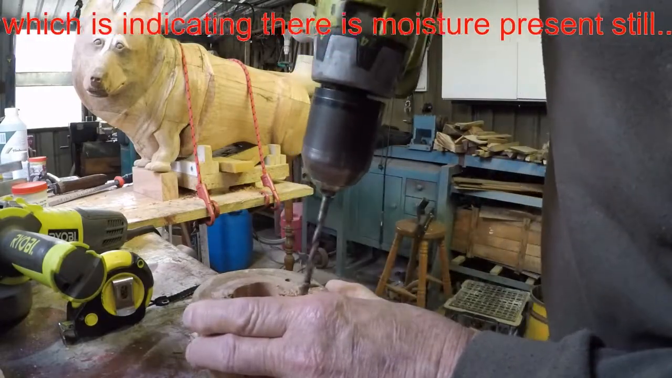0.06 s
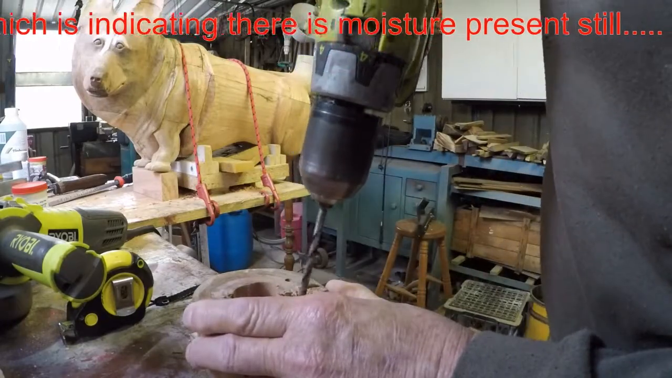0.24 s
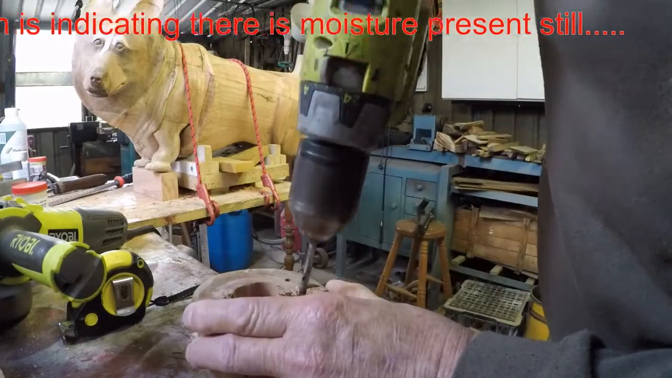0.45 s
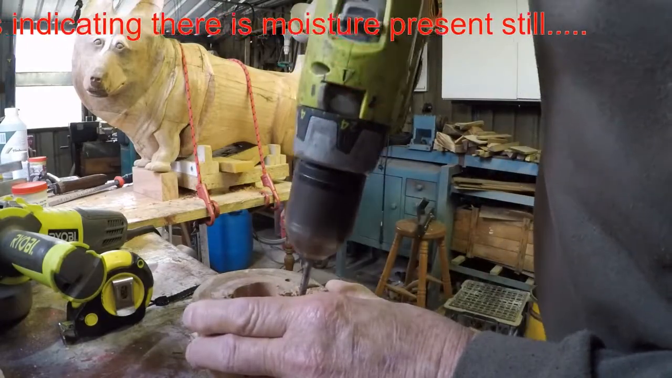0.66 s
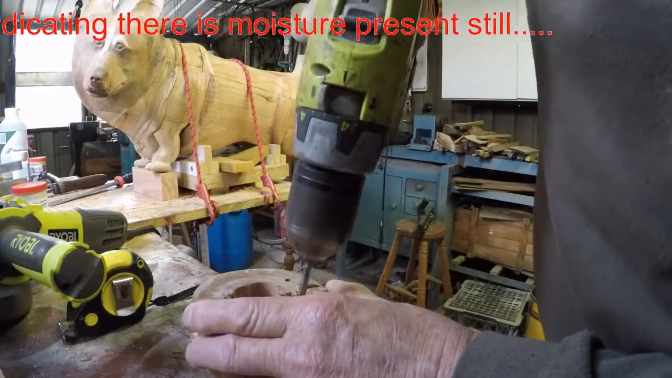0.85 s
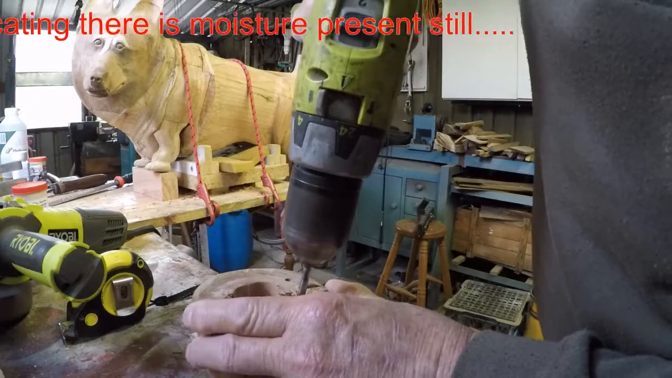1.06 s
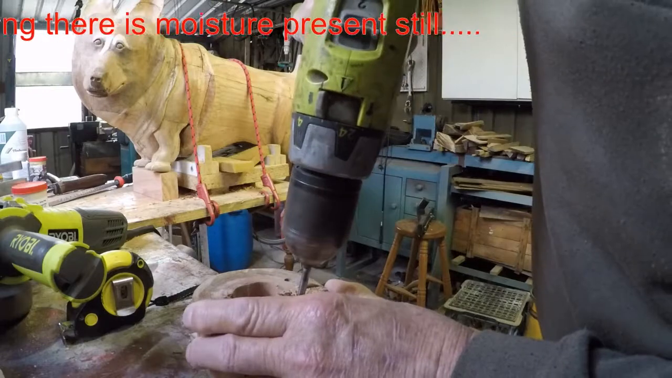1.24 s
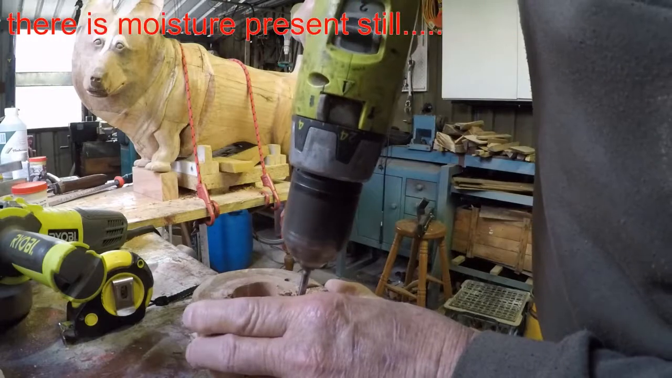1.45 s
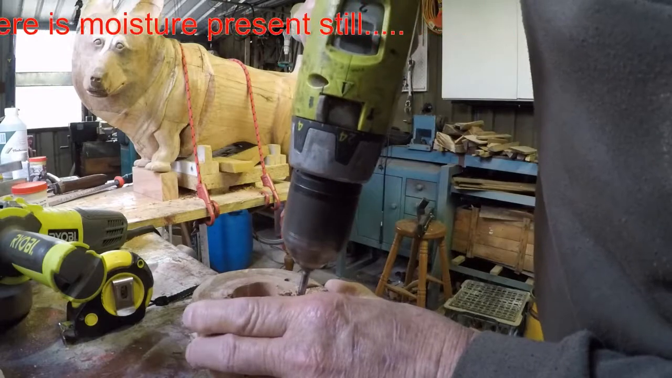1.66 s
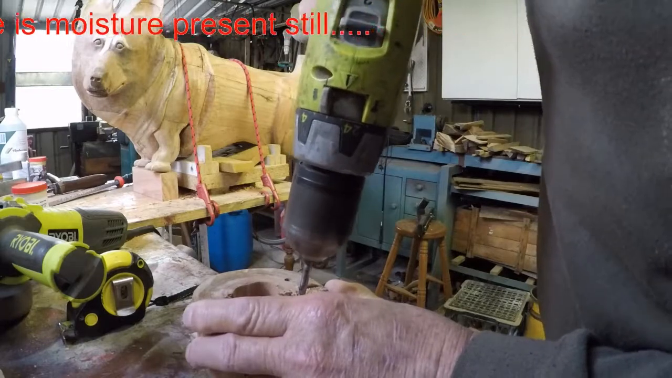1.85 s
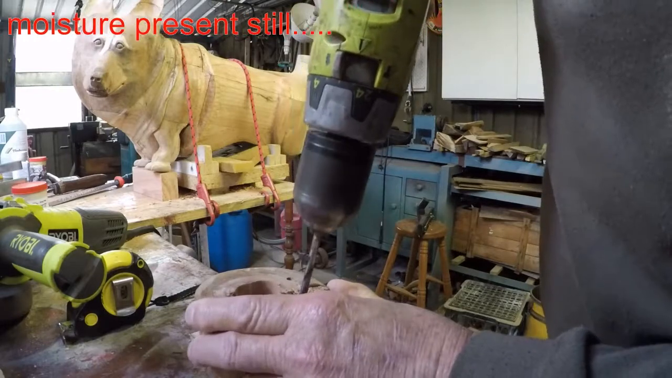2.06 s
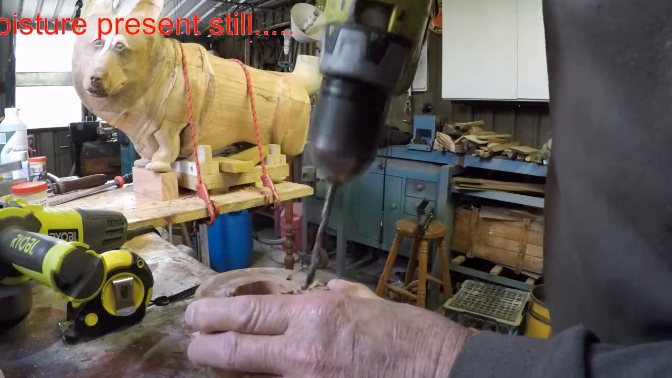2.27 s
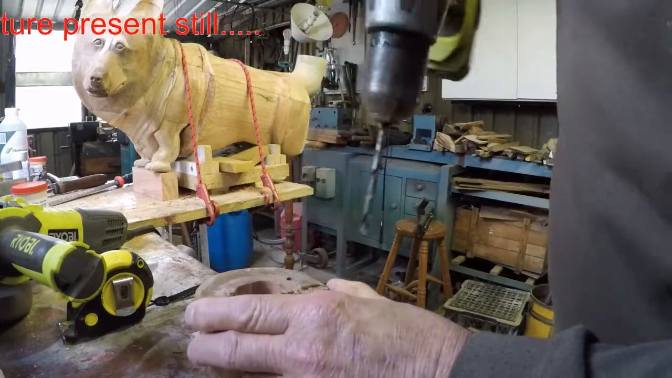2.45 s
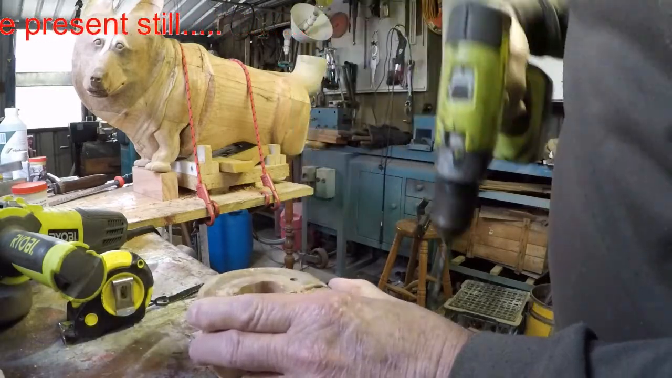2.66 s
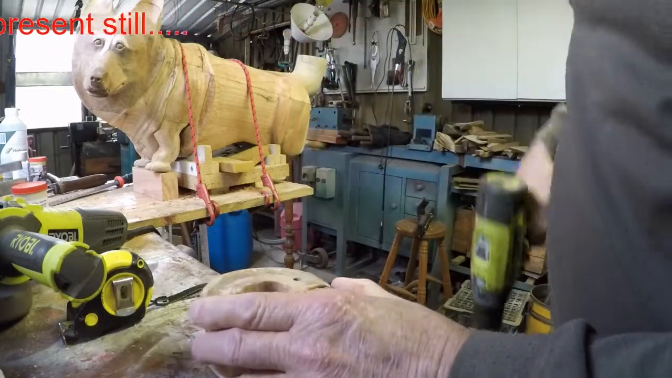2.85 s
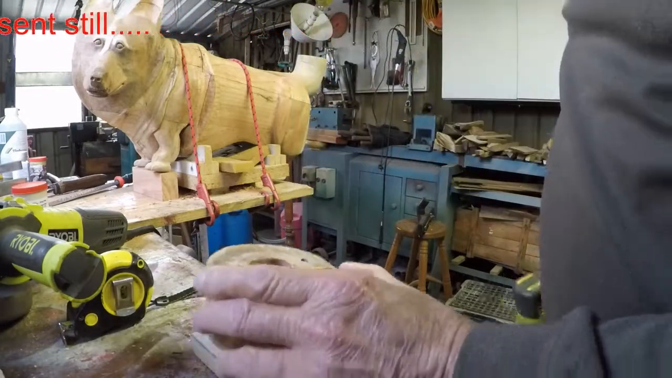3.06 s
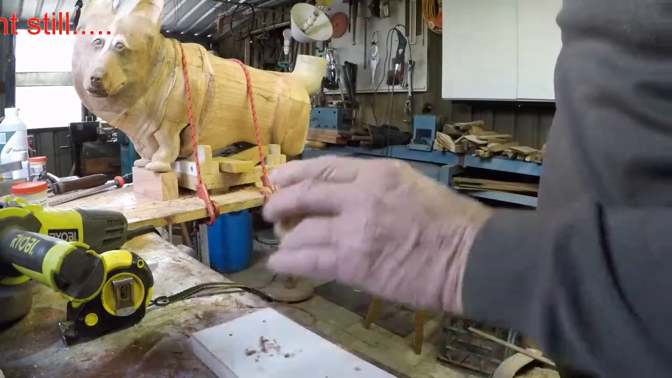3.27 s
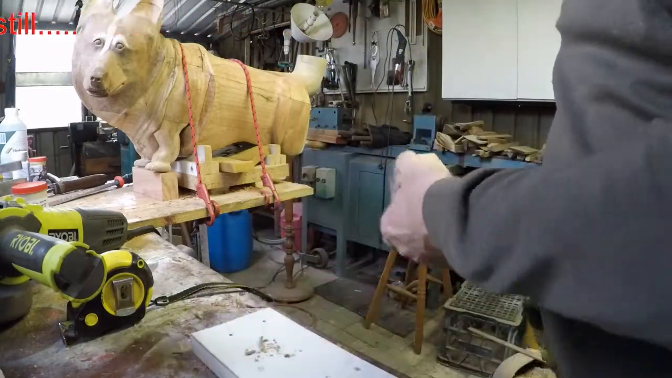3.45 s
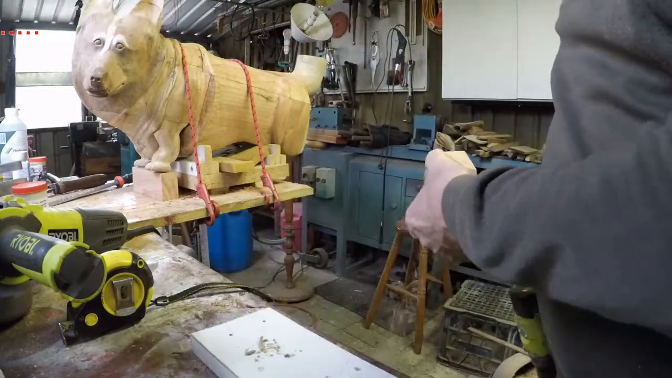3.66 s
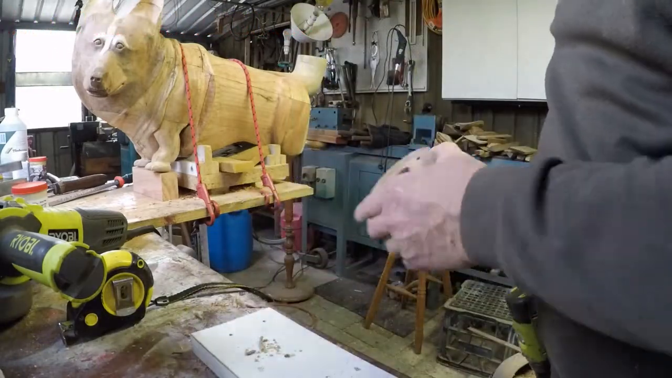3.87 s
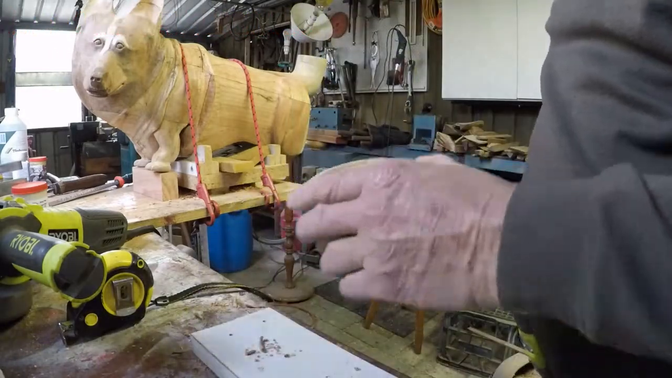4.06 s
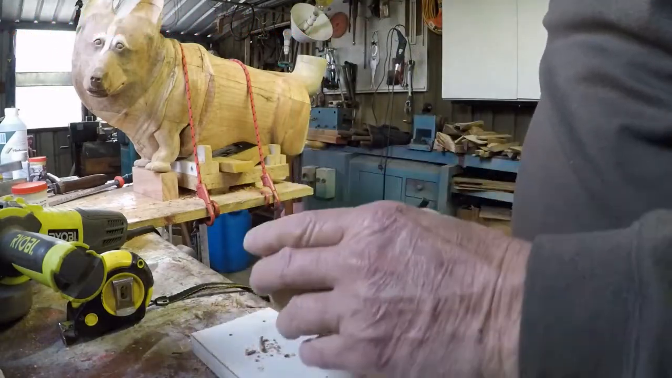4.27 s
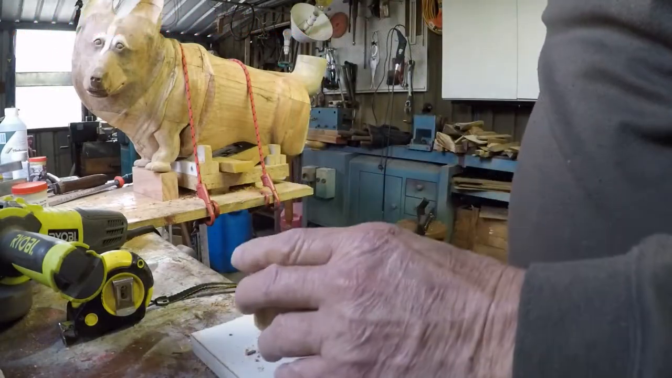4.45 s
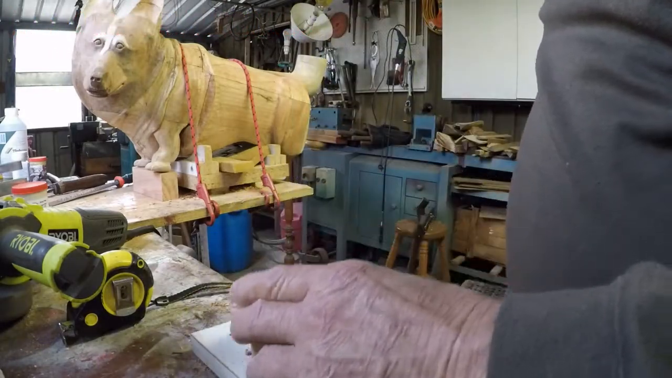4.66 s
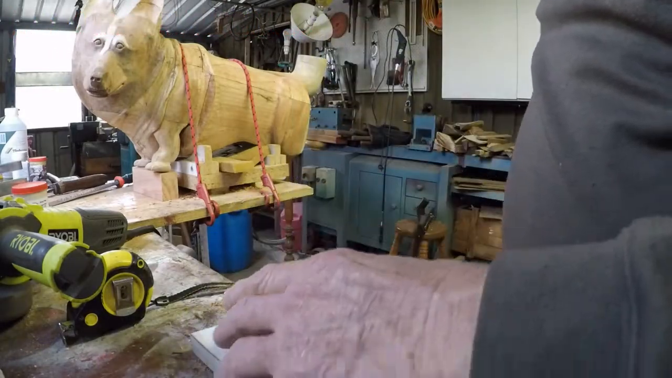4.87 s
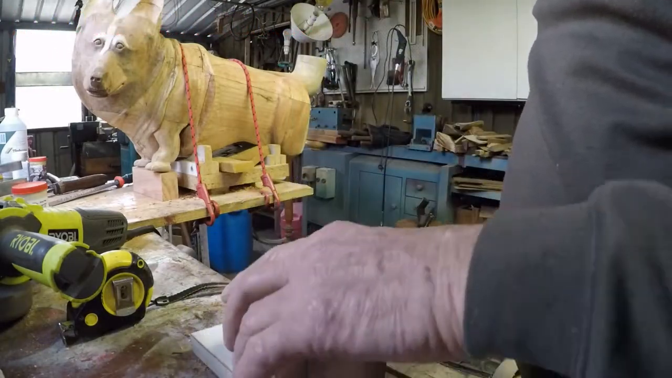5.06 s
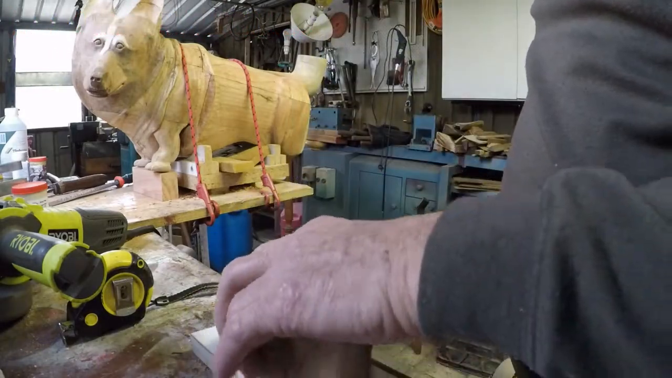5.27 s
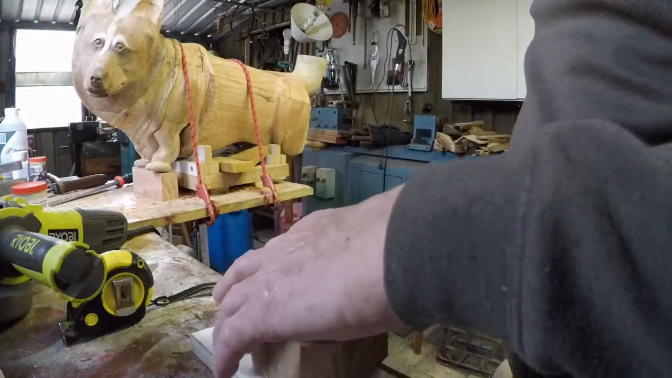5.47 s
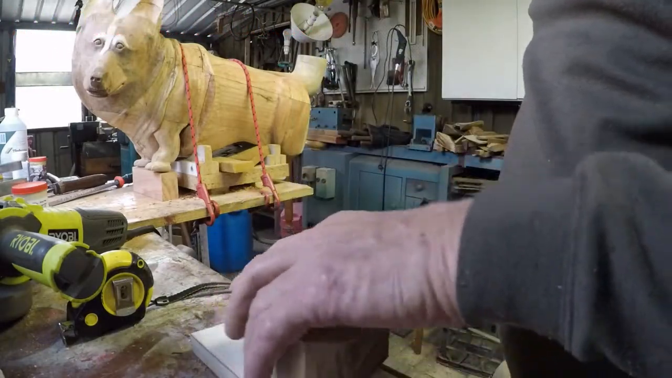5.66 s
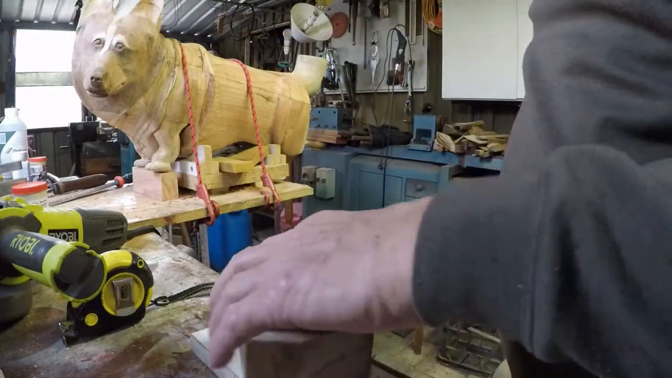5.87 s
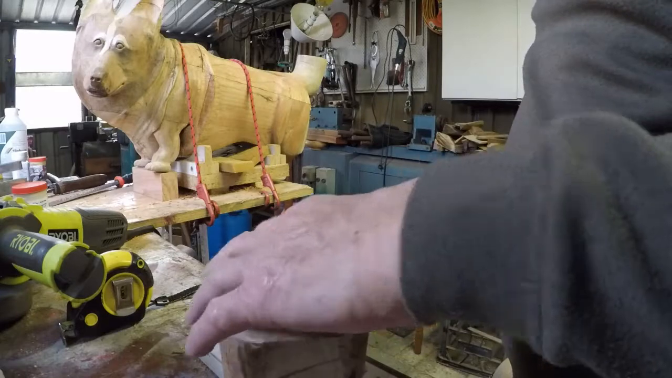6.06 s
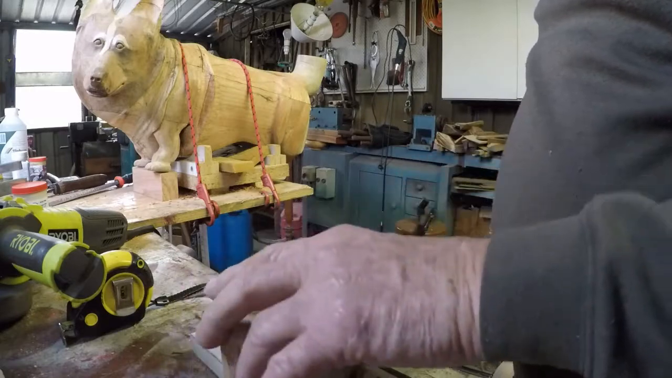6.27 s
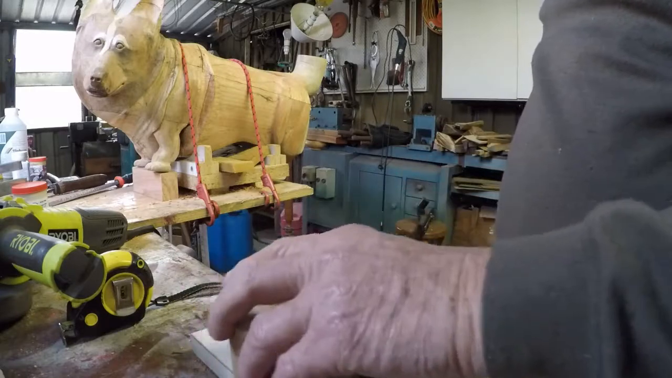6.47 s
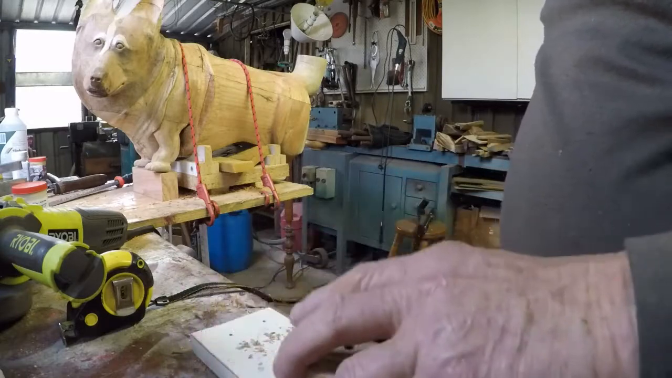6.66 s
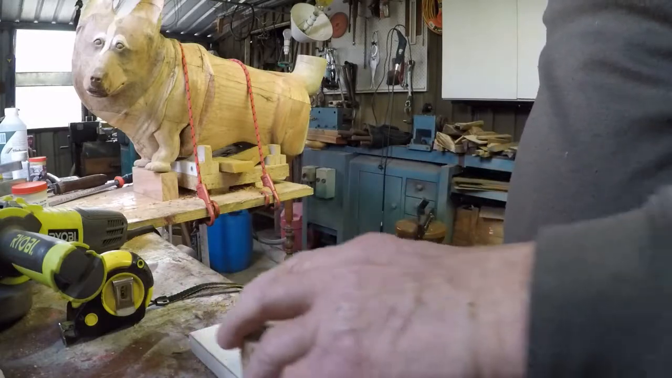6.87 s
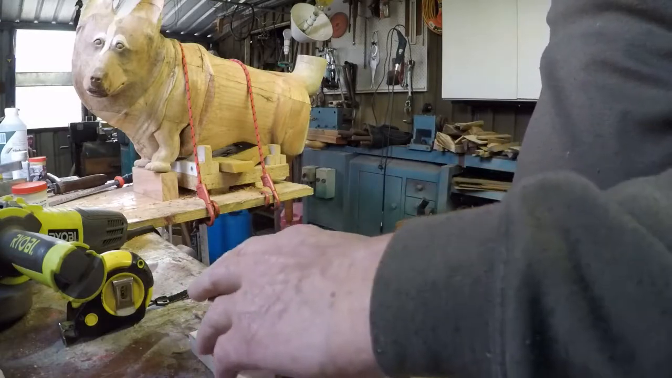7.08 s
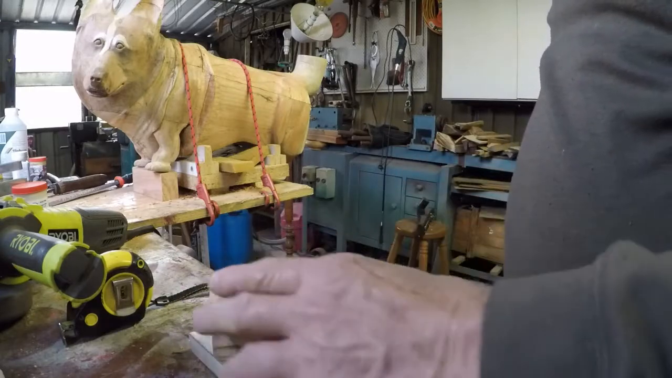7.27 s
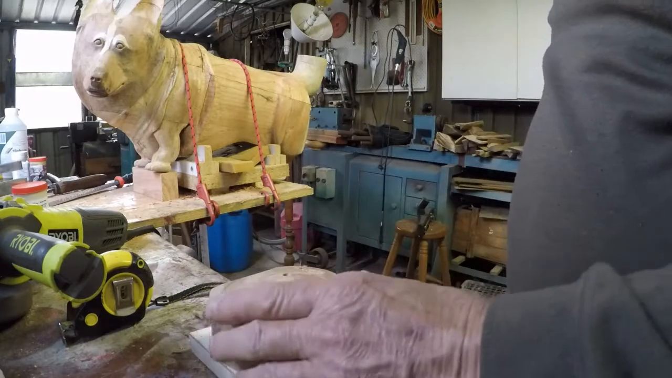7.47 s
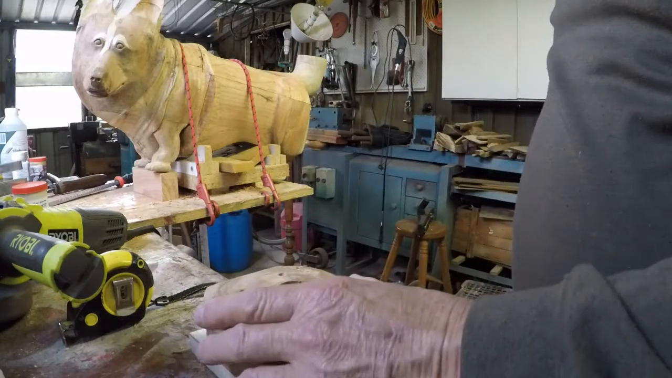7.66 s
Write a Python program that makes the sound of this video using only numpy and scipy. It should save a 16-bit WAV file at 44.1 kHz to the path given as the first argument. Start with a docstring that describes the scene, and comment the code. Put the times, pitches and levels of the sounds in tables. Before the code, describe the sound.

Loud, close drill motor with bench hum and fine cutting hiss, chirping as the bit works deeper, then a hard clack and sudden quiet. A small thud sets the tool down. Low shop air, a barely audible distant siren and two-note bird calls remain while a wood block is bumped, rocked and briefly scuffed on a resonant bench; the sound begins nearly mono and opens to stereo.

```python
"""A cordless drill bores into a wooden block on a workshop bench close to two microphones: motor-locked tones
over shaped noise, with chirped squeaks. It brakes in bursts of noise and is set down, its modes struck ringing.
The block is then knocked and slid: blows and stick-slip grains ring the bench, over filtered scuffing noise.
Outdoors a far siren wails throughout, a gliding tone; later a bird repeats a two-note call; shop air is noise.
The camera's pair is mono below the top treble at first, then spreads to stereo; loud sound is ducked."""
import sys
import numpy as np
from scipy import signal
from scipy.fft import rfft, irfft, next_fast_len
from scipy.io import wavfile
from scipy.ndimage import uniform_filter1d

SR = 44100
rng = np.random.default_rng(int(sys.argv[2]) if len(sys.argv) > 2 else 0)


def bounce(signal):
    """Save signal as a 16-bit WAV file at the path given by the first command-line argument."""
    frames = np.transpose(np.atleast_2d(signal))
    limited = np.clip(frames, -1, 1)
    pcm = np.round(limited * 32767).astype(np.int16)
    wavfile.write(sys.argv[1], SR, pcm)


N = 340452   # samples

# All spectra give relative density; noise is scaled to rms 1 after shaping.
# Drill, close by. Motor speed, overshooting, sagging under load, dropping on release: time_s, turns_per_s
MOTOR_SPEED = [(0, 236), (.105, 238), (.125, 251), (.19, 254), (.26, 263), (.4, 268), (.47, 263),
               (.6, 260.5), (.92, 256), (1.1, 257.4), (1.35, 256.5), (1.5, 258), (1.6, 254), (1.67, 247),
               (1.78, 256), (1.9, 258), (2.02, 250), (2.12, 248), (2.21, 262), (2.24, 257), (2.27, 248),
               (2.33, 230), (2.36, 222)]
# How hard the drill works: time_s, whirr_db, bench_shudder_db, gear_whine_db
EFFORT = [(0, -20.5, -34.5, -52), (.04, -22.5, -30, -46.5), (.065, -19.5, -25, -27.5),
          (.1, -20.5, -31, -33), (.13, -18.5, -31, -22.5), (.24, -18.5, -32.5, -25.5),
          (.5, -17.5, -23.5, -25.5), (.72, -16.5, -33, -28), (.95, -17, -25, -26), (1.5, -17, -27.5, -24.5),
          (1.68, -18.5, -30, -30.5), (1.8, -19.5, -38.5, -25.5), (1.99, -18, -33.5, -29),
          (2.03, -19.5, -35, -24), (2.23, -19.5, -39.5, -25.5), (2.265, -19.5, -32, -32),
          (2.29, -22.5, -45, -40), (2.36, -20.5, -38, -67)]
# Brushes, gears and cutting: pitch_hz, density_db
WHIRR_SPECTRUM = [(180, -31.5), (300, -26), (445, -8.5), (641, -8), (830, -13), (1330, 1), (2480, -13.5),
                  (3200, -15), (3550, -12), (3850, -4), (4760, -6.5), (5880, -4), (8210, -30),
                  (11300, -34.5), (14700, -79), (22000, -120)]
# Resonances of the housing: pitch_hz, width_hz, lift_db
HOUSING = [(1228, 130, 4.5), (3770, 120, 4), (4420, 270, 1.5), (2642, 40, 5), (3180, 45, 6.5),
           (5305, 65, 6), (5860, 240, 1), (6460, 300, 5), (7470, 170, -2), (8800, 300, 4.5)]
# Cooling air: pitch_hz, density_db
FAN_SPECTRUM = [(11000, -30), (12000, -6), (12800, 0), (14000, -2), (15250, -4), (15450, -40)]
# Bench under load: pitch_hz, density_db
SHUDDER_SPECTRUM = [(20, 0.5), (35, 4), (70, -4.5), (110, -1.5), (142, 7), (185, -1.5), (350, 0.5),
                    (600, -33.5)]
# Hiss of the bit cutting fibres: time_s, level_db
CUTTING_LEVEL = [(0, -51), (.3, -35.5), (.55, -29.5), (1.5, -30), (2.2, -36.5), (2.26, -69)]
# Colour of that hiss: pitch_hz, density_db
CUTTING_SPECTRUM = [(2200, -20.5), (2800, -0.5), (3200, 0.5), (3600, -3.5), (4200, -40)]
# Bench humming with the motor while the bit is deep: time_s, level_db
HUM_LEVEL = [(0, -44), (.22, -28), (.5, -29), (.6, -20), (.82, -14), (1.0, -17.5), (1.15, -15),
             (1.3, -16.5), (1.47, -14), (1.58, -20), (1.7, -21), (1.8, -44), (2.12, -36), (2.3, -48)]
# High whine at 50 times the motor turns: time_s, level_db
TOP_WHINE_LEVEL = [(0, -68), (.3, -41.5), (.6, -40), (1.4, -41), (1.6, -50), (1.9, -45), (2.3, -56)]
# Gear tones beside the whine: multiple of motor turns, level_db (against the whine curve)
GEAR_ORDERS = [(10, -14), (20, -10)]
# Tones under load: multiple of motor turns, level_db (against the cutting hiss)
LOAD_ORDERS = [(7.5, -12), (11.4, -10), (12.5, -6), (17, -5), (22.6, -3)]
GEAR_RATIO = 16   # motor turns for one turn of the bit
PARTNER_MULTIPLE, PARTNER_DB = 2.46, -16   # weak tone with the hum: times motor turns, against the hum
# The bit catches on its way out: start_s, level_db
BUMPS = [(1.962, -20), (2.014, -18.5)]
# Modes those catches ring: pitch_hz, level_db, t60_s
BUMP_MODES = [(254, 3.5, 0.068), (335, -10, .05), (415, -13, 0.073)]
# The bit squeaks in the hole: start_s, peak_db, pitch_hz (at mid squeak)
SQUEAKS = [(1.2531, -24.5, 7800), (1.309, -16.5, 7640), (1.4197, -46, 7740), (1.478, -14.5, 7540),
           (1.5883, -27, 7550), (1.6117, -33.5, 8840), (1.6433, -14, 7450), (1.6696, -26, 8860),
           (1.7055, -20, 7660), (1.729, -32.5, 8640)]

# The spindle locks: start_s, level_db
BRAKE_SNAPS = [(2.3444, -11), (2.362, -2), (2.375, -17)]
# The case jolts as the spindle stops, one row: start_s, level_db, pitch_hz, t60_s
BRAKE_THUD = (2.368, -13, 330, 0.045)
# The snap's colour: pitch_hz, density_db
SNAP_SPECTRUM = [(200, -34), (500, 1.5), (1300, 6.0), (5500, 6.5), (8000, -16.0), (11000, -18.0),
                 (14000, -4.0), (15800, -26.5)]
# The tool lands and settles on the bench: start_s, level_db
TOUCHES = [(2.665, -45), (2.7083, -17.5), (2.7284, -27), (2.744, -30), (2.767, -54), (3.879, -60),
           (4.17, -45)]
# Modes of the tool: pitch_hz, level_db, t60_s
TOOL_MODES = [(210, 10.5, 0.029), (412, 7, 0.037), (615, -4, 0.082), (910, -6.5, 0.062), (1310, 1, 0.027),
              (1634, -5, 0.092), (2280, 3.5, 0.009), (3980, -10, .03), (5800, -18, 0.13)]
# Grit of each touch: pitch_hz, density_db
TOUCH_SPECTRUM = [(100, -6), (300, 4.5), (1500, -11.0), (4500, -22.0), (7000, -36)]

# The block strikes the bench: start_s, blow_db, hardness_db_per_octave
KNOCKS = [(4.605, -14, -3), (4.618, -3.5, 2.5), (4.716, -9, -3), (4.789, -23, -0.5), (5.113, -26, -3),
          (5.225, -30, -3), (5.458, -28, -13), (5.529, 0, 0), (5.5416, -6, -2.5), (5.738, -20, -12),
          (5.817, -18, -2), (6.24, -26, -3), (6.303, -12, -13), (6.657, -8, -13), (6.737, 1.5, -4.5),
          (6.752, -24.5, 6), (6.868, -13, -5), (6.941, -12.5, -2.5), (7.01, -23, -10), (7.067, -4.5, -12.5),
          (7.515, -23, -0.5)]
# Airborne tick of a knock: pitch_hz, density_db
KNOCK_SPECTRUM = [(1000, 9.0), (2000, 6.0), (4000, -10.5), (8000, -20.0), (12000, -40)]
# Chips snap under the block: start_s, level_db
CHIP_SNAPS = [(5.19, -50), (6.302, -43), (6.604, -52), (6.68, -37), (6.754, -23), (6.826, -42),
              (6.943, -40), (7.018, -41)]
# Colour of a chip's snap: pitch_hz, density_db
CHIP_SPECTRUM = [(1500, -15), (3000, -10.0), (7000, 4), (10000, -7), (14000, -40)]
# Bench as each microphone feels it: pitch_hz, t60_s (base, scaled for blows and rubs), struck_db,
# rubbed_db, left_share (signed, right microphone = 1)
BENCH_MODES = [(97, 0.23, -3, -0.5, -0.16), (127.3, 0.49, -14, 1.5, -0.16),
               (147.5, 0.21, 2.5, -2.5, -0.058), (182, 0.035, -24, -16.5, -0.36), (265, 0.16, 0, -7, -0.2),
               (375, 0.04, -5.5, -14, -0.43), (507, 0.064, -2, 3, -0.39), (588, 0.1, -13.5, -10.5, -1.51),
               (990, 0.0077, -23, 11, -0.92), (1210, 0.011, -1, 8, -0.58), (1840, 0.0072, -17, -18, -0.41),
               (2300, 0.012, -29, -19, -1.08)]
# The block pushes and rocks the bench: start_s, length_s, rumble_db, grind_db
ROCKS = [(4.61, 0.056, -17, -28), (4.66, 0.11, -19, -30), (5.11, 0.053, -27.5, -36.5),
         (5.22, 0.17, -16.5, -25), (5.43, 0.013, -18.5, -31), (5.548, 0.007, -15, -26),
         (5.58, 0.042, -18, -49), (5.66, 0.31, -31, -45.5), (5.83, 0.11, -12.5, -27),
         (5.98, 0.015, -23.5, -31), (6.13, 0.11, -36, -58.5), (6.25, 0.032, -23.5, -34.5),
         (6.31, 0.091, -17, -32.5), (6.67, 0.036, -14, -35), (6.74, 0.047, -5, -36),
         (6.82, 0.022, -30, -26.5), (6.87, 0.021, -15.5, -28), (6.92, 0.096, -10, -27.5),
         (7.07, 0.052, -35, -35), (7.11, 0.027, -23, -38.5), (7.31, 0.2, -41.5, -62),
         (7.53, 0.047, -24, -37), (7.63, 0.051, -28, -41)]
# Its face rubs along the top: start_s, length_s, rasp_db, scuff_db
RUBS = [(4.72, 0.15, -70, -51.5), (5.12, 0.023, -62, -53.5), (5.185, 0.057, -65, -49.5),
        (5.26, 0.16, -58, -48), (5.3, 0.045, -66, -44.5), (5.78, 0.061, -61, -49.5),
        (5.85, 0.05, -50.5, -40), (6.3, 0.11, -57, -48), (6.665, 0.0074, -52, -48), (6.745, 0.01, -33, -48),
        (6.76, 0.017, -45, -43.5), (6.81, 0.04, -55, -42.5), (6.865, 0.027, -38, -44),
        (6.925, 0.019, -37, -52), (6.94, 0.068, -52, -45.5), (6.68, 0.3, -62, -50), (7.5, 0.05, -57, -53.5)]
ROCK_RISE_DB_S, ROCK_FALL_DB_S = 900, 340
RUB_RISE_DB_S, RUB_FALL_DB_S = 600, 290
# Surface scuffing: pitch_hz, density_db
SCUFF_SPECTRUM = [(530, -57), (900, -0.5), (1480, -5.5), (1890, -6), (2540, -8.5), (2890, -7), (5390, -7.5),
                  (6580, 1), (12700, -32), (14000, -38), (15000, -57)]
# Broad lifts of the scuff: pitch_hz, width_hz, lift_db
SCUFF_GRAIN = [(2630, 250, 7), (5500, 1000, -2), (6700, 1100, -5.5)]
GRIT_PER_S, GRIT_SHARE = 1500, 0.31   # chips crushed under the block (rate before clumping), share in the scuff

# Siren, far off outdoors: time_s, level_db
SIREN_LEVEL = [(2.4, -67), (2.85, -71), (3.1, -63), (3.35, -78), (3.95, -78), (4.12, -62), (4.55, -61),
               (4.75, -71), (5.3, -69), (5.42, -63), (5.7, -68), (6.25, -73), (6.45, -65), (6.75, -62),
               (7.0, -78)]
# It climbs towards one pitch, then sinks towards another, over and over
WAIL_START_S, WAIL_RISE_S, WAIL_PERIOD_S = 3.95, 2.1, 3.9
WAIL_LOW_HZ, WAIL_AIM_HZ, WAIL_REST_HZ, WAIL_CLIMB_S = 685, 1680, 650, .95
# Bird outdoors: start_s, level_db
BIRD_CALLS = [(2.545, -62), (3.32, -61), (4.06, -63), (4.81, -72), (5.54, -64), (6.28, -64), (7.07, -63)]
# One call of two notes: time_s (from its start), pitch_hz, level_db (against the call)
BIRD_NOTES = [(0, 1735, -30), (.01, 1745, -4), (.05, 1800, 1), (0.081, 2250, 2), (0.122, 2750, 1),
              (.15, 2800, -38), (.21, 2260, -38), (.23, 2270, 0), (.3, 2356, 4.5), (.37, 2520, 0),
              (.39, 2600, -40)]

# Steady ambience of the shop: pitch_hz, density_db
AMBIENCE_SPECTRUM = [(35, -32.5), (60, -1), (98, -15), (171, -3.5), (626, -18.5), (907, -21.5),
                     (2190, -26.5), (2350, -27.5), (3490, -34), (8040, -39), (10400, -40.5), (15400, -70.5)]
AMBIENCE_DB = -47.5
# Moving air of the shop: time_s, low_rumble_db, bright_rustle_db
AIR_LEVELS = [(2.3, -43, -50), (2.5, -33, -60), (3.0, -35, -60.5), (3.7, -39, -64.5), (4.35, -50.5, -60.5),
              (4.6, -52, -68), (5.3, -36, -60), (5.5, -27, -68), (5.8, -29, -66), (6.0, -38, -65),
              (6.4, -38, -62.5), (6.9, -25.5, -56.5), (7.12, -33, -67), (7.35, -35, -66), (7.72, -34, -63)]
# Low rumble: pitch_hz, density_db
RUMBLE_SPECTRUM = [(15, 9.5), (40, 16), (90, 8), (200, -6), (500, -53.5)]
RUMBLE_LEAN_DB = 6   # cut on the left; half as much lift on the right
# Bright rustle: pitch_hz, density_db
RUSTLE_SPECTRUM = [(3000, -17.5), (6000, -3.5), (8500, -1), (11000, -6.0), (15000, -24.5)]

# Spread of the microphone pair: time_s, stereo_share (0-1)
WIDTH = [(0, 0), (3.65, 0), (3.85, 0.2), (4.1, 0.46), (4.5, 0.99), (7.72, 1.0)]
SHOP_T60_S, STREET_T60_S = 0.33, 0.39
LIMIT_RATIO, GAIN_RATIO = 0.14, .22   # dB of ducking per dB over the threshold: limiter, slower control
CUTOFF_HZ = 15600


def drill():
    """Gear noise throbs with motor and bit, under tones locked to the motor speed."""
    whirr_db, shudder_db, whine_db = curves(EFFORT)
    (speed,), (top_db,), (cut_db,) = curves(MOTOR_SPEED), curves(TOP_WHINE_LEVEL), curves(CUTTING_LEVEL)
    hum = amp(curves(HUM_LEVEL)[0])
    turn = 2 * np.pi * np.cumsum(speed) / SR   # motor angle, radians
    bit_turn = turn / GEAR_RATIO
    throb_db = 0.5 * np.sin(bit_turn) + 0.46 * np.sin(turn) + 0.51 * drift(40)

    whirr = colour(rng.standard_normal(N), WHIRR_SPECTRUM, HOUSING) * amp(whirr_db + throb_db)
    cutting = colour(rng.standard_normal(N), CUTTING_SPECTRUM) * amp(cut_db + throb_db)
    lean_db = np.array([[2.5], [-2.5]])   # fan towards the left
    fan_noise = rng.standard_normal(N) + 2.5 * rng.standard_normal((2, N))
    fan = colour(fan_noise, FAN_SPECTRUM) * amp(-36.5 + drift(3.9) + throb_db + lean_db)
    shudder = colour(rng.standard_normal(N), SHUDDER_SPECTRUM) * amp(shudder_db + 2 * drift(4.7))

    hum_throb = amp(1.2 * drift(4)) * (1 + 0.25 * np.sin(bit_turn))
    tones = hum * hum_throb * wavering(turn, 12.0, rough=0.11)
    tones += hum * amp(PARTNER_DB) * wavering(PARTNER_MULTIPLE * turn, 10, rough=.3)
    tones += amp(top_db) * wavering(50 * turn, 18, rough=0.26)
    tones += amp(whine_db) * 1.2 * wavering(15 * turn, 60, rough=.85)
    for multiple, db in GEAR_ORDERS:
        tones += amp(whine_db + db) * wavering(multiple * turn, 25, rough=.6)
    for multiple, db in LOAD_ORDERS:
        tones += amp(cut_db + db) * wavering(multiple * turn, 30, rough=.7)
    bump_db = np.array(BUMPS)[:, 1]
    for hz, db, t60 in BUMP_MODES:
        tones += ring(clicks(BUMPS, bump_db + db), hz, t60)
    # all fades out over 13 ms, up to the last snap of the brake
    running = np.clip((BRAKE_SNAPS[-1][0] - np.arange(N) / SR) / 0.013, 0, 1)
    return (whirr + cutting + fan + shudder + tones) * running


def squeaks():
    """The bit whistles in the hole: short bell-shaped sines that fall in pitch."""
    out, t = np.zeros(N), np.arange(-300, 300) / SR
    for s, db, hz in SQUEAKS:
        middle = round((s + 0.0025) * SR)
        swell = np.exp(-(t / 0.0039) ** 2)
        whistle = np.sin(2 * np.pi * (hz * t - 35000 * t ** 2))   # falls 70 Hz each ms
        out[middle - 300:middle + 300] += amp(db) * swell * whistle
    return out


def brake():
    """Locking metal snaps in bright noise that dies in tens of milliseconds; the case rings a short thud."""
    snaps = burst(clicks(BRAKE_SNAPS, np.array(BRAKE_SNAPS)[:, 1] - 6), SNAP_SPECTRUM, 0.033)
    s, db, hz, t60 = BRAKE_THUD
    thud = ring(clicks([[s]], db), hz, t60)
    return snaps + signal.sosfilt(signal.butter(2, 500, fs=SR, output="sos"), thud)


def set_down():
    """Each touch is a gritty burst and strikes the tool's modes with new strengths."""
    luck_db = rng.normal(0, 0.67, (len(TOUCHES), len(TOOL_MODES)))
    level_db = np.array(TOUCHES)[:, 1]
    out = burst(clicks(TOUCHES, level_db - 1.0), TOUCH_SPECTRUM, 0.059)
    for k, (hz, db, t60) in enumerate(TOOL_MODES):
        strikes = clicks(TOUCHES, level_db + db - 4.5 + luck_db[:, k])
        out += (-1) ** k * ring(strikes, hz, t60)
    return signal.sosfilt(signal.butter(4, 6000, fs=SR, output="sos"), out)


def block():
    """Knocks and stick-slip grains ring the bench; the surface scuffs in the air."""
    rumble, grind = gestures(ROCKS, ROCK_RISE_DB_S, ROCK_FALL_DB_S)
    rasp, scuffing = gestures(RUBS, RUB_RISE_DB_S, RUB_FALL_DB_S)
    _, blow_db, hard_db = np.transpose(KNOCKS)

    # heard through the air, alike at both microphones
    ticks = burst(clicks(KNOCKS, blow_db + 3.43 * hard_db - 24), KNOCK_SPECTRUM, 0.021)
    ticks += burst(clicks(CHIP_SNAPS, np.array(CHIP_SNAPS)[:, 1]), CHIP_SPECTRUM, 0.012)
    out = ticks * np.ones((2, 1))

    # the whole bench rocks on after each push
    sway = signal.lfilter([.0002], [1, -.9998], rumble)
    out += unit(ring(rng.standard_normal(N), 37.7, 0.16)) * sway * amp([[-24], [-12]])

    slips = rng.random((2, N)) < 300 * amp(6.0 * drift(18)) / SR   # slips come in clumps
    grains = slips * rng.laplace(size=(2, N)) + 0.074 * rng.standard_normal((2, N))
    luck_db = rng.normal(0, 1.6, (len(KNOCKS), len(BENCH_MODES)))
    for k, (hz, t60, struck_db, rubbed_db, left) in enumerate(BENCH_MODES):
        # wood contact is soft
        soft = signal.butter(2, [.6 * hz, 1.5 * hz], "band", fs=SR, output="sos")
        # bending waves in a plank: low pitches arrive last
        late = int(0.015 / np.sqrt(hz) * SR)
        strike_db = blow_db + struck_db + hard_db * np.log2(hz / 150) + luck_db[:, k]
        blows = np.roll(clicks(KNOCKS, strike_db), late)
        struck = signal.sosfilt(soft, ring(blows, hz, 0.56 * t60))
        level = rumble if hz < 300 else grind if hz < 800 else rasp
        rubbing = signal.sosfilt(soft, ring(grains[int(hz > 300)], hz, 1.37 * t60))
        rubbed = unit(rubbing) * level * amp(rubbed_db - 4.0)
        out += (-1) ** k * (struck + rubbed) * np.array([[left], [1]])

    crushed = rng.random(N) < GRIT_PER_S * amp(4.0 * drift(25)) / SR   # in clumps
    grit = GRIT_SHARE * unit(crushed * rng.laplace(size=N))
    scuff_noise = grit + rng.standard_normal(N) + rng.standard_normal((2, N))
    scuff = colour(scuff_noise, SCUFF_SPECTRUM, SCUFF_GRAIN)
    return out + scuff * scuffing * amp(2.0 * drift(97) + 1.7 * drift(9.2))


def siren():
    """A far tone follows the wail, its strength and phase wandering."""
    return amp(curves(SIREN_LEVEL)[0]) * wavering(2 * np.pi * np.cumsum(wail()) / SR, 35, rough=.9)


def wail():
    """Siren pitch: an easing climb, then an easing fall that ends where the climb began."""
    u = (np.arange(N) / SR - WAIL_START_S) % WAIL_PERIOD_S
    climb_left = np.exp(-np.minimum(u, WAIL_RISE_S) / WAIL_CLIMB_S)
    climb = WAIL_AIM_HZ + (WAIL_LOW_HZ - WAIL_AIM_HZ) * climb_left
    end_ratio = (WAIL_LOW_HZ - WAIL_REST_HZ) / (climb.max() - WAIL_REST_HZ)
    fall = np.maximum(u - WAIL_RISE_S, 0) / (WAIL_PERIOD_S - WAIL_RISE_S)   # 0-1
    return WAIL_REST_HZ + (climb - WAIL_REST_HZ) * end_ratio ** fall


def bird():
    """A gliding sine sings each two-note call, roughened by a husky flutter in level."""
    t, out = np.arange(N) / SR, np.zeros(N)
    husk = 1 + 0.6 * drift(120)
    for s, call_db in BIRD_CALLS:
        hz, db = curves(BIRD_NOTES, t - s)
        singing = (t > s) * (t < s + BIRD_NOTES[-1][0])
        out += amp(db + call_db) * husk * np.sin(2 * np.pi * np.cumsum(hz) / SR) * singing
    return out


def outdoors():
    """Siren and bird arrive mostly as echoes."""
    far = siren() + bird()
    return 0.72 * far + amp(-0.5) * room(far, STREET_T60_S, 4000)


def air():
    """Steady ambience and a lumpy low rumble, partly shared by the pair; bright rustle, separate on each side."""
    rumble_db, rustle_db = curves(AIR_LEVELS)
    steady_noise = rng.standard_normal(N) + 1.68 * rng.standard_normal((2, N))
    steady = colour(steady_noise, AMBIENCE_SPECTRUM) * amp(AMBIENCE_DB)
    rumble_noise = rng.standard_normal(N) + 0.3 * rng.standard_normal((2, N))
    rumble = colour(rumble_noise, RUMBLE_SPECTRUM) * amp(rumble_db + 2 * drift(5.5))
    lean = amp([[-RUMBLE_LEAN_DB], [RUMBLE_LEAN_DB / 2]])
    rustle = colour(rng.standard_normal((2, N)), RUSTLE_SPECTRUM) * amp(rustle_db)
    return steady + rumble * lean + rustle


def room(x, t60, dull_hz):
    """A diffuse tail for each side: dying, dulled noise as the echo pattern."""
    t = np.arange(SR) / SR
    tail = rng.standard_normal((2, SR)) * amp(-60 * t / t60) * (t > .004)
    tail = signal.sosfilt(signal.butter(1, dull_hz, fs=SR, output="sos"), tail)
    return signal.fftconvolve(x[None], unit(tail) / np.sqrt(SR), axes=1)[:, :N]


def amp(db):
    """Gain of a level in dB."""
    return np.exp(np.asarray(db) * (np.log(10) / 20))


def unit(x):
    """Scaled to rms 1."""
    return x / np.sqrt(np.mean(x ** 2) + 1e-20)


def curves(rows, t=None):
    """Each column after the first, interpolated over time."""
    s, *columns = np.transpose(rows)
    t = np.arange(N) / SR if t is None else t
    return [np.interp(t, s, c) for c in columns]


def colour(x, spectrum, peaks=()):
    """Shapes noise by a spectrum and lifts it at resonances; rms 1."""
    size = next_fast_len(N)
    hz = np.arange(size // 2 + 1) * SR / size + 1
    db = np.interp(np.log(hz), np.log([p[0] for p in spectrum]), [p[1] for p in spectrum])
    db = db + sum(lift_db / (1 + (2 * (hz - f) / w) ** 2) for f, w, lift_db in peaks)
    return unit(irfft(rfft(x, size) * amp(db), size)[..., :N])


def drift(rate):
    """Slow chance of spread 1, drawn at every eighth sample and smoothed to about rate Hz."""
    r = np.exp(-16 * np.pi * rate / SR)
    draws = rng.standard_normal(N // 8 + 1200)
    slow = signal.lfilter([1], [1, -2 * r, r * r], draws)[1198:]   # settled part
    return np.interp(np.arange(N) / 8, np.arange(len(slow)), unit(slow))


def wavering(phase, rate, rough=0.53):
    """A tone whose strength and phase wander: a narrow band of noise riding on it."""
    return (1 + rough * drift(rate)) * np.sin(phase) + rough * drift(rate) * np.cos(phase)


def ring(x, hz, t60):
    """A unit click sets a sine ringing, of height 1 before it decays."""
    r, w = amp(-60 / (t60 * SR)), 2 * np.pi * hz / SR
    return signal.lfilter([0, np.sin(w)], [1, -2 * r * np.cos(w), r * r], x + 1e-18)


def clicks(rows, db):
    """One impulse for each row."""
    out = np.zeros(N)
    out[[round(r[0] * SR) for r in rows]] = amp(db)
    return out


def burst(impulses, spectrum, t60):
    """Noise that swells within milliseconds of each impulse and dies away."""
    shape = signal.lfilter([1], [1, -amp(-60 / (t60 * SR))], impulses)
    return signal.lfilter([.03], [1, -.97], shape) * colour(rng.standard_normal(N), spectrum)


def gestures(rows, rise_db_s, fall_db_s):
    """Gain over time for each level column: every row rises to its level, holds for its length and falls."""
    t = np.arange(0, N / SR, .001)
    levels = []
    for s, length, *level_db in rows:
        slope_db = rise_db_s * np.maximum(s - t, 0) + fall_db_s * np.maximum(t - s - length, 0)
        levels.append(np.array(level_db)[:, None] - slope_db)
    loudest_db = np.max(levels, axis=0)
    return curves(np.column_stack([t, *amp(loudest_db)]))


def held(db, fall_db):
    """A level that jumps up at once and sinks by fall_db a second."""
    ramp = fall_db * np.arange(N) / SR
    return np.maximum.accumulate(db + ramp) - ramp


def scene():
    """The drill gets the shop's echo, but its bass travels through the bench and stays dry; all else is added."""
    tool = drill() + squeaks() + brake() + set_down()
    airborne = signal.sosfilt(signal.butter(4, 420, "high", fs=SR, output="sos"), tool.mean(axis=0))
    echo = amp(-11.0) * room(airborne, SHOP_T60_S, 5000)
    return tool + echo + block() + outdoors() + air()


def record(dry):
    """A limiter and a slower gain control duck loud sound; all but the top treble starts mono; the top is cut."""
    peak_db = 20 * np.log10(np.abs(dry).max(axis=0) + 1e-9)
    limit_db = LIMIT_RATIO * held(np.maximum(peak_db - 0.5, 0), 70.0)
    slow_db = GAIN_RATIO * held(np.maximum(peak_db + 14.0, 0), 34.0)
    duck_db = uniform_filter1d(np.roll(limit_db + slow_db, -64), size=128)   # eases in just ahead of a peak
    x = dry * amp(0.5 - duck_db)
    x = 0.92 * np.tanh(x / 0.92)   # the last peaks are rounded
    mid, side = (x[0] + x[1]) / 2, (x[0] - x[1]) / 2
    top = signal.sosfiltfilt(signal.butter(8, 11500, "high", fs=SR, output="sos"), side)
    width = np.clip(curves(WIDTH)[0], 0, 1)
    side = width * side + (1 - width) * top
    steep = signal.ellip(10, .5, 70, CUTOFF_HZ, fs=SR, output="sos")
    return signal.sosfilt(steep, np.array([mid + side, mid - side]))


dry = scene()
out = record(dry)
bounce(out)
```